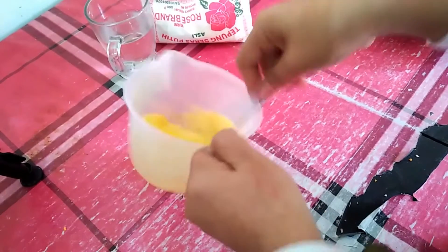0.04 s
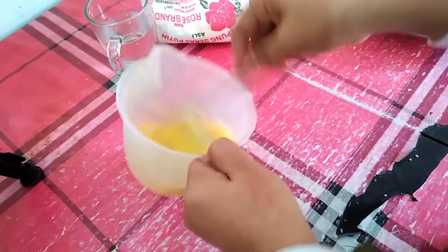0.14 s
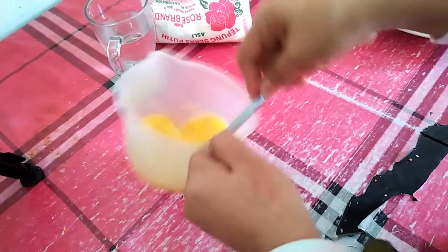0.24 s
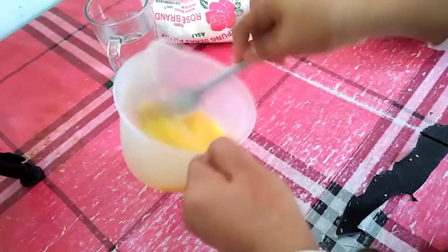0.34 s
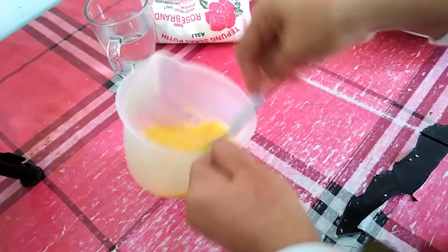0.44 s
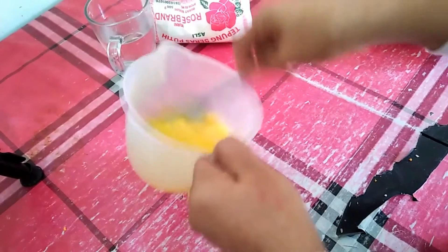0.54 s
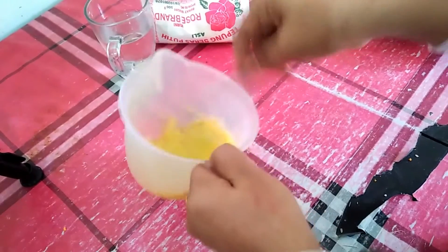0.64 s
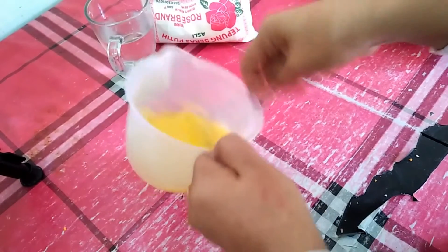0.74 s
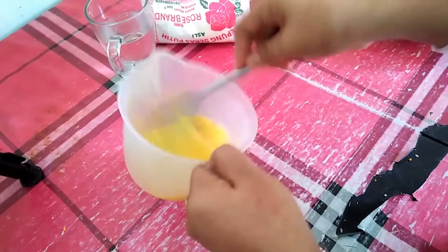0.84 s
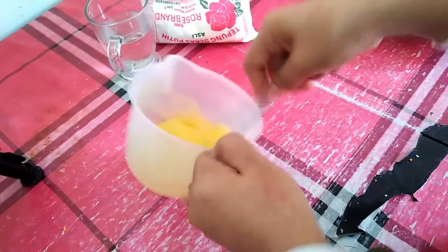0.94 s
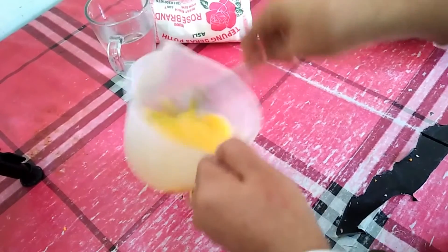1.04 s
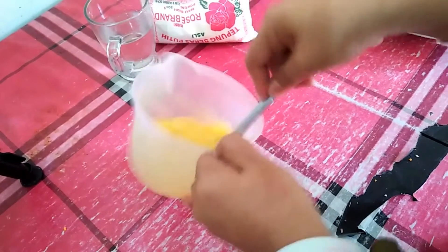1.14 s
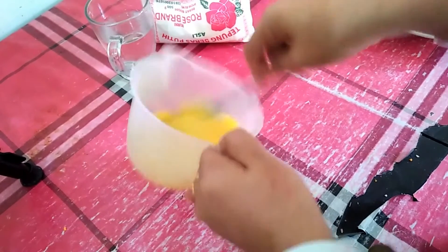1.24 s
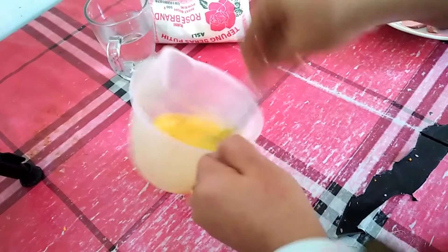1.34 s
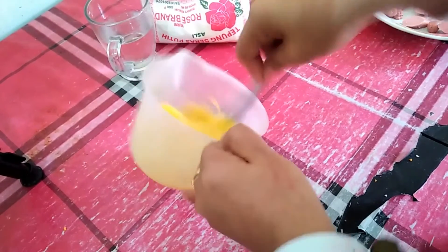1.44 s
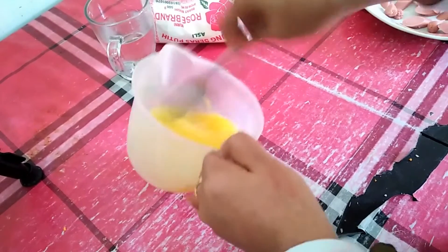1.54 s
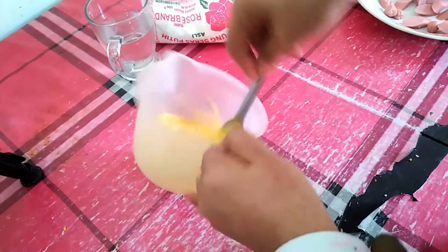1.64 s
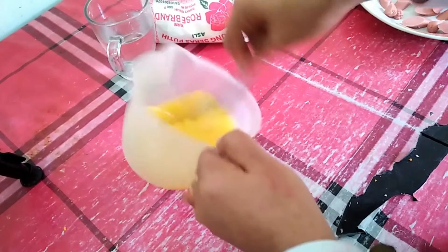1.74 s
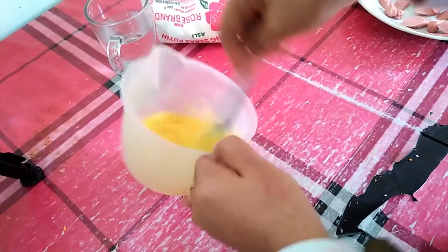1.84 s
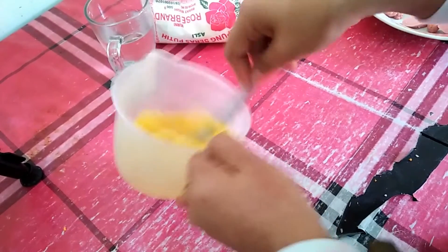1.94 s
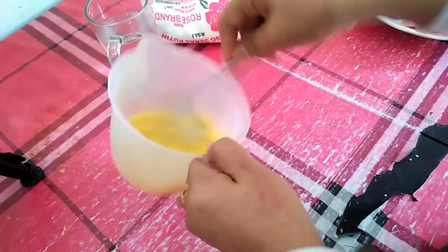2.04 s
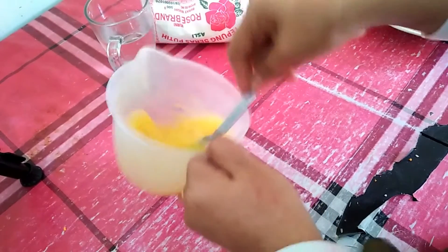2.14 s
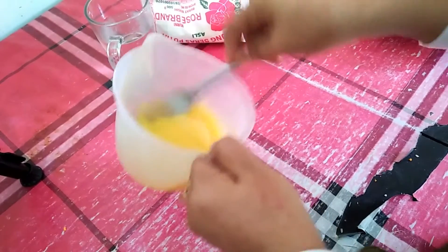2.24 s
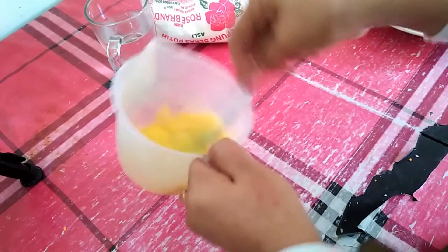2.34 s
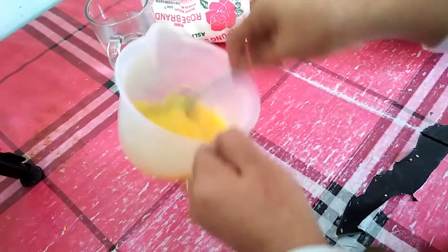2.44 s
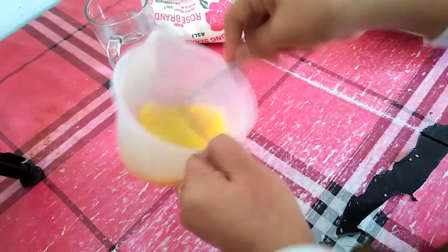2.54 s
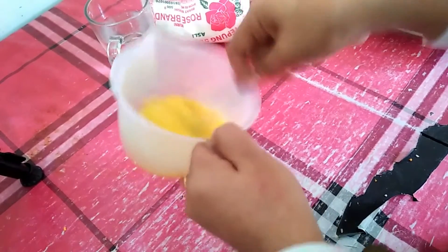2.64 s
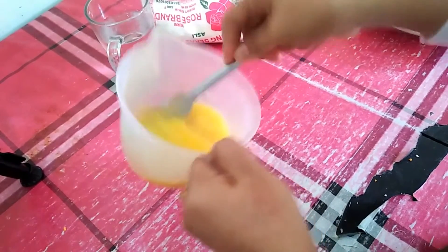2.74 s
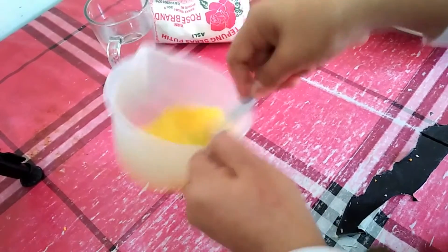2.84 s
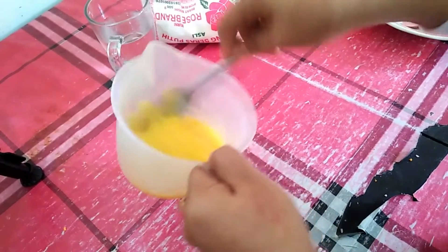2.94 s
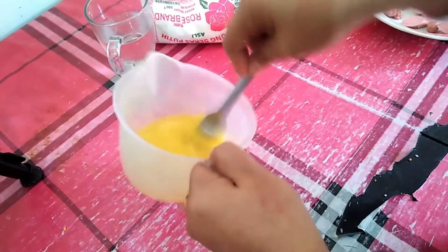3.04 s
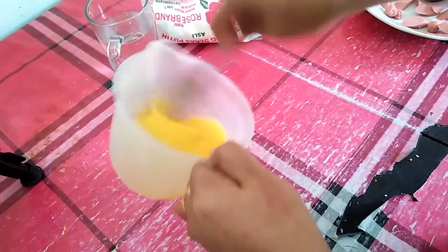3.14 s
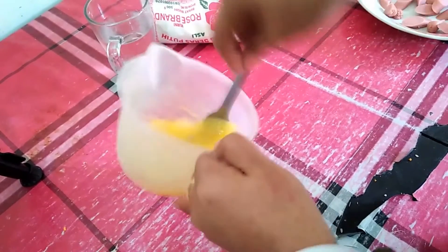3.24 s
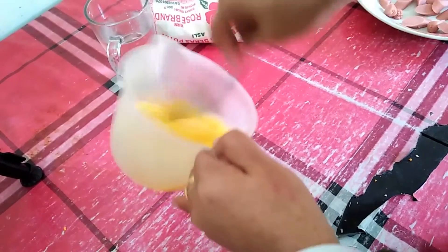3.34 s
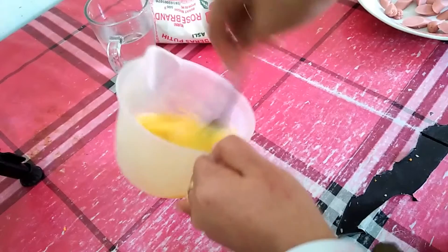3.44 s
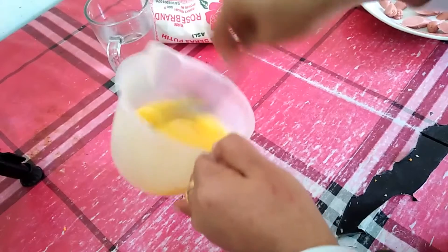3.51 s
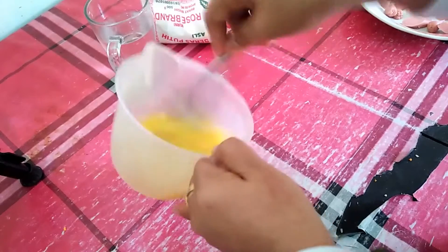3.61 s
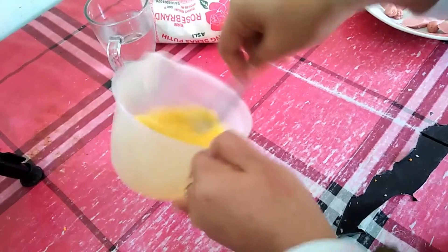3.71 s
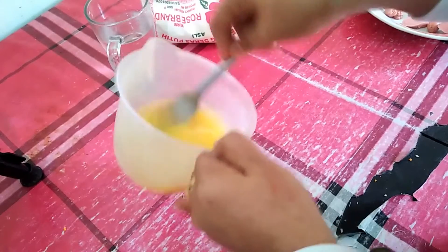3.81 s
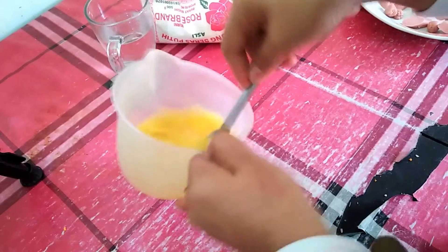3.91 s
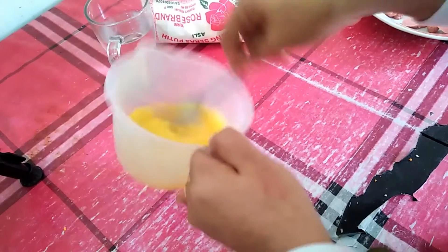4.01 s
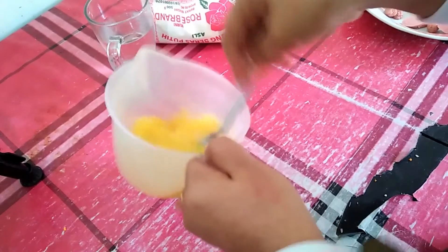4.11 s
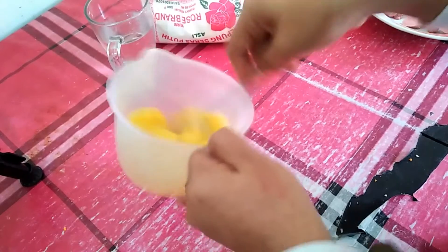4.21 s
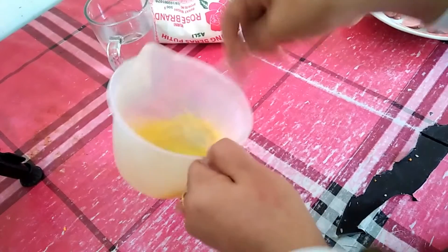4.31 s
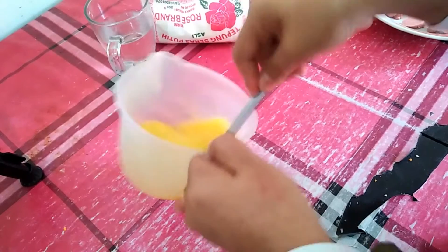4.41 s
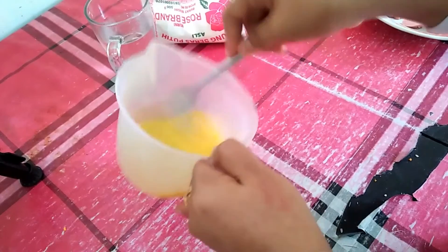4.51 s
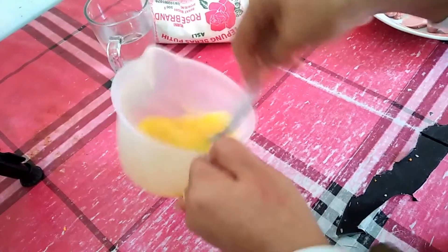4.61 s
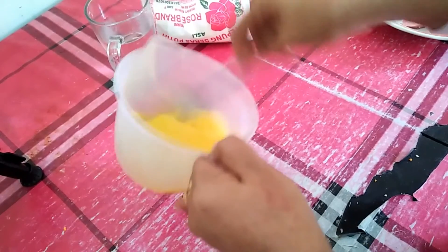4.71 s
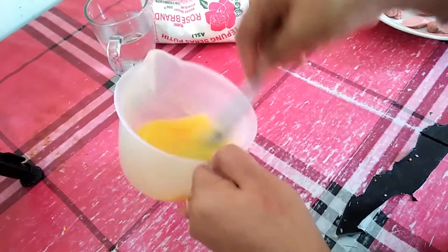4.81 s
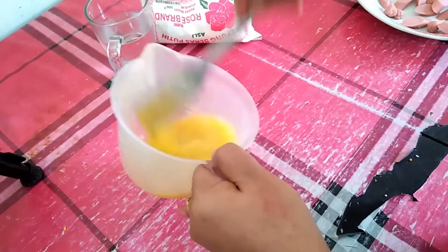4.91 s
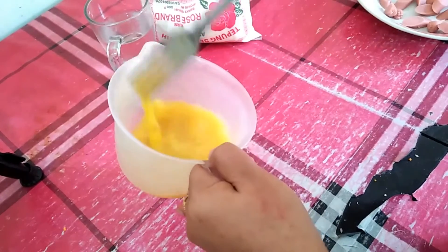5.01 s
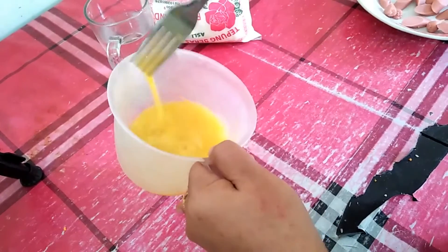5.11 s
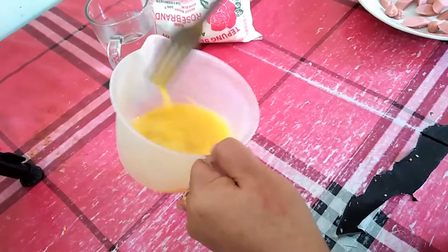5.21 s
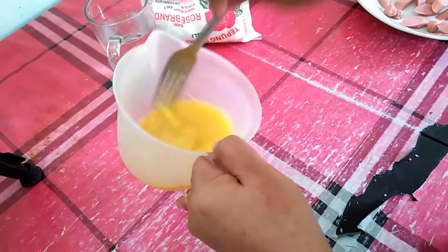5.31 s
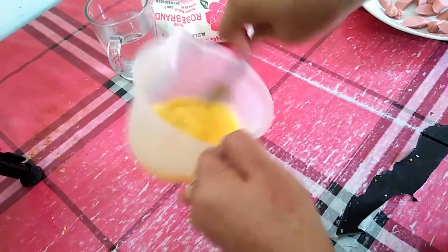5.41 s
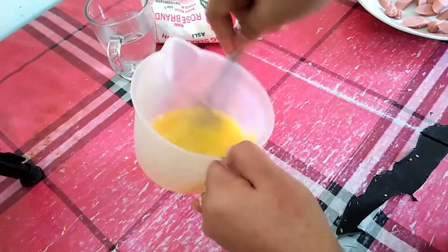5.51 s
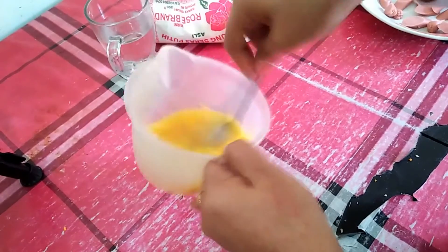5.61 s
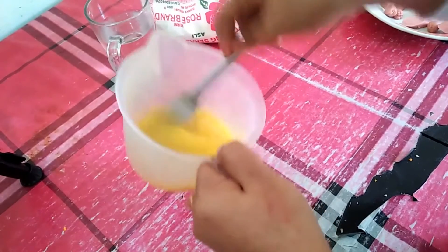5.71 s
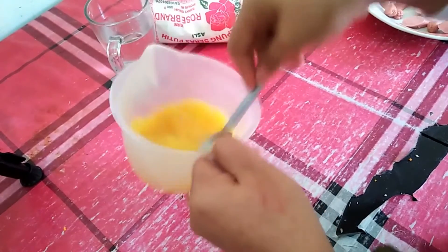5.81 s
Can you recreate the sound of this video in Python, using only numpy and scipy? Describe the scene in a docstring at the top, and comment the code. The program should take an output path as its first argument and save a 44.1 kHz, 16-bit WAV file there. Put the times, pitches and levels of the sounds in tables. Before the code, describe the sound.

Fast, bright fork clicks against a hand-held plastic jug, nearly six strokes a second, with sloppy egg patter in a small hard kitchen.

```python
"""Quick, bright steel clicks come first: a fork beats eggs in a hand-held plastic jug.
It makes nearly six strokes a second, with one short pause. Each touch is a soft thud of noise, damped
jug modes, and noise bursts for the clack of the plastic and the click of the tines.
The egg slops and crackles in patter, bubbles and hiss driven by the strokes, over a faint low swell.
A small hard kitchen answers, and a rough hum wavers faintly in the distance over a low rumble."""
import sys
import numpy as np
from scipy import signal
from scipy.fft import rfft, irfft, next_fast_len
from scipy.io import wavfile
from scipy.ndimage import uniform_filter1d, map_coordinates

SR = 44100
rng = np.random.default_rng(int(sys.argv[2]) if len(sys.argv) > 2 else 0)


def transcribe(signal):
    """Save signal, clipped to [-1, 1], as a 16-bit WAV file at the path in sys.argv[1]."""
    frames = np.atleast_2d(signal).T
    limited = np.clip(frames, -1, 1)
    pcm = np.round(limited * 32767).astype(np.int16)
    wavfile.write(sys.argv[1], SR, pcm)


N = 258425  # length of the scene in samples
BLOW = np.arange(SR // 16) / SR  # time axis of one short event, s


def amp(db):
    """Decibels to gain."""
    return 10 ** (np.asarray(db) / 20)


def unit(x):
    """Scaled to rms 1."""
    return x / np.sqrt(np.mean(x ** 2) + 1e-20)


def along(points, hz):
    """Interpolates (f/Hz, value) points on a log frequency axis."""
    f, v = np.transpose(points)
    return np.interp(np.log(hz + 1), np.log(f + 1), v)


def wobble(rate):
    """A smooth random curve with this many knots a second."""
    knots = rng.standard_normal(int(N * rate / SR) + 4)
    return map_coordinates(knots, [np.arange(N) * rate / SR])


def filtered(x, response):
    """Zero-phase filter: the spectrum of x times a response of frequency."""
    m = next_fast_len(N + SR // 2)
    return irfft(rfft(x, m) * response(np.fft.rfftfreq(m, 1 / SR)), m)[..., :N]


def coloured(x, spectrum, patchy_db=0):
    """Minimum-phase filter with the given spectrum; if patchy, each row gets its own peaks and dips."""
    n = x.shape[-1]
    half = next_fast_len(n)
    db = along(spectrum, np.fft.rfftfreq(2 * half, 1 / SR))
    if patchy_db:
        knots = np.clip(rng.standard_normal((len(x), 36)), -2, 2)
        db = db + patchy_db * signal.resample(knots, half + 1, axis=1)
    # folding the cepstrum onto positive time makes the filter causal
    cepstrum = irfft(np.log(amp(db)))
    cepstrum[..., 1:half] *= 2
    cepstrum[..., half + 1:] = 0
    return irfft(rfft(x, 2 * half) * np.exp(rfft(cepstrum)))[..., :n]


def placed(shapes, s, db):
    """Lays one shape per event at its time; its level is its energy spread over 10 ms."""
    size = np.sqrt(np.sum(shapes ** 2, axis=1) / (SR // 100) + 1e-20)
    levelled = shapes * (amp(db) / size)[:, None]
    where = np.round(np.maximum(s, 0)[:, None] * SR).astype(int) + np.arange(len(BLOW))
    return np.bincount(where.ravel(), levelled.ravel(), N)[:N]


def impulses(s, strength):
    """One single-sample push per event."""
    return np.bincount(np.round(np.abs(s) * SR).astype(int), strength, N)[:N]


# Fader curve of the distant hum, before its trim: [t/s, level/dB]
HUM_LEVEL = [(0, -62), (.9, -81), (1.08, -49), (1.39, -68), (1.58, -45.5), (1.76, -66), (2.3, -70),
             (2.97, -53.5), (3.57, -48.5), (3.9, -66.5), (4.3, -47), (5.0, -76), (5.17, -55), (5.5, -38.5),
             (5.86, -46)]
# Tonal lines of the hum, relative: [f/Hz, level/dB]
HUM_LINES = [(66.2, 9), (100, -10), (151, -10)]
# Colour of the rough noise in the hum, relative: [f/Hz, level/dB per Hz]
HUM_NOISE = [(20, -18), (45, -0.5), (66, 1), (105, 5), (160, -12.5), (260, -9), (600, -52)]
# Colour of the house rumble, relative: [f/Hz, level/dB per Hz]
RUMBLE = [(15, -5), (35, -19), (70, -7), (140, -5), (250, -17.5), (500, -20), (1000, -20.5), (3000, -25),
          (12000, -33.5)]


def background():
    """A distant hum of wavering sines and coloured noise over the low rumble of the house."""
    t = np.arange(N) / SR
    turns = np.cumsum(1 + .03 * wobble(16)) / SR  # all lines drift in pitch together
    lines = unit(sum(amp(db + 1.8 * wobble(10)) * np.sin(2 * np.pi * hz * turns) for hz, db in HUM_LINES))
    hum = lines + amp(-6.0) * unit(coloured(rng.standard_normal(N), HUM_NOISE))
    rumble = unit(coloured(rng.standard_normal(N), RUMBLE))
    trim_db, rumble_db = -6.0, -63
    return amp(np.interp(t, *np.transpose(HUM_LEVEL)) + trim_db) * hum + amp(rumble_db) * rumble


# Decay time of the room: [f/Hz, t60/s]
KITCHEN_DECAY = [(200, 0.17), (320, 0.55), (550, 0.2), (1000, 0.49), (3500, 0.44), (9500, 0.52),
                 (15000, 0.4)]
# Colour of the echo from the walls, relative: [f/Hz, level/dB]
WALL_ECHO = [(150, -17), (270, -8), (322, 2), (375, -14), (450, 1), (600, -1.5), (1000, -9), (2200, -5),
             (5000, -10.5), (9500, -9.5), (14000, -7)]


def kitchen(x, db, build_s):
    """The room's answer: decaying noise tails, redrawn every 1/8 s as the jug and hands move."""
    wet, step = np.zeros(N + SR), SR // 8
    for start in range(0, N, step):
        hz, t, z = signal.stft(rng.standard_normal(SR // 2), SR, nperseg=256)
        decay = amp(-60 * t / along(KITCHEN_DECAY, hz)[:, None])
        tail = signal.istft(z * decay, SR, nperseg=256)[1]
        tail *= 1 - np.exp(-(np.arange(len(tail)) / SR / build_s) ** 2)
        answer = signal.fftconvolve(x[start:start + step], tail / np.linalg.norm(tail))
        wet[start:start + len(answer)] += answer
    return amp(db) * coloured(wet[:N], WALL_ECHO)


# Level of the side signal, treble only, relative: [f/Hz, level/dB]
SIDE_LEVEL = [(3000, -75), (3700, -40), (4400, -12), (6000, -9), (9000, -11), (13000, -9)]


def treble_side(near):
    """A treble-only side signal of decaying noise widens the stereo."""
    return coloured(kitchen(near, db=4, build_s=.003), SIDE_LEVEL)


# Drive of the fork through the egg, in three spells of deep beating: [t/s, thud level/dB]
PLUNGE_DRIVE = [(0, -30.5), (1.15, -36), (1.75, -53), (2.2, -48), (2.36, -31.5), (3.22, -39), (3.44, -54.5),
                (4.3, -38), (4.8, -31.5), (5.86, -59)]


def plunge_db(s):
    """How hard the fork is driven through the egg at these times."""
    return np.interp(s, *np.transpose(PLUNGE_DRIVE))


def low_swell(hz, t60, db):
    """A faint, low damped sine swells with each stroke, stronger when the plunge is stronger."""
    s = np.transpose(STROKES)[0]
    pushes = impulses(s, amp(plunge_db(s)))
    t = np.arange(SR // 4) / SR
    swell = np.sin(2 * np.pi * hz * t) * amp(-60 * t / t60) * (1 - np.exp(-t / .012))
    return amp(db) * signal.fftconvolve(pushes, swell)[:N]


def bubbles(per_s, hz, spread, cycles):
    """Air folded into the egg: tiny sine blips at random times and pitches, damped by the thick liquid."""
    count, t = int(per_s * N / SR), BLOW[:int(SR * cycles / hz)]
    pitch, size = np.clip(rng.standard_normal((count, 2)), -1.6, 1.6).T[:, :, None]
    turns = hz * np.exp(spread * pitch) * t
    fade = amp(8.4 * size - 40 * turns / cycles)  # 40 dB down after this many cycles
    blips = np.sin(2 * np.pi * turns) * fade * (1 - np.exp(-turns))
    where = rng.integers(0, N, (count, 1)) + np.arange(len(t))
    return unit(np.bincount(where.ravel(), blips.ravel(), N)[:N])


def slosh(settle_s, db):
    """Each plunge sets the whole egg swinging, and it gurgles low until it settles."""
    s = np.transpose(STROKES)[0]
    age = np.maximum(np.arange(N) / SR - s[:, None], 0) / settle_s
    swing = amp(plunge_db(s)) @ (age * np.exp(1 - age))
    return amp(db) * swing * bubbles(per_s=340, hz=473, spread=.3, cycles=17)


def mode(hz, t60, rise_s, scatter):
    """A damped sine mode for each event; pitch and decay time vary a little at random."""
    variation = np.array([scatter, .2])[:, None, None]
    tune, life = np.exp(rng.standard_normal((2, len(hz), 1)) * variation)
    swing = np.sin(2 * np.pi * np.reshape(hz, (-1, 1)) * tune * BLOW)
    return swing * amp(-60 * BLOW / (t60 * life)) * (1 - np.exp(-BLOW / rise_s))


# The egg folds over pockets of air; pitch is before scatter: [t/s, f/Hz, level/dB]
GLUGS = [(.757, 620, -31), (.782, 633, -33.5), (.873, 630, -35.5), (1.04, 690, -34), (1.075, 350, -40),
         (1.24, 600, -37.5), (2.734, 330, -36.5), (2.912, 330, -36), (4.023, 500, -29), (4.54, 567, -32),
         (4.712, 480, -41), (4.876, 508, -32.5)]


def glugs():
    """Each pocket of air in the egg sounds a short, low note with a briefer one below it."""
    s, hz, db = np.transpose(GLUGS)
    note = mode(hz, t60=.04, rise_s=0.0036, scatter=0.053)
    note += amp(1.5) * mode(0.47 * hz, t60=0.01, rise_s=.002, scatter=0.11)
    return placed(note, s, db)


# Colour of egg slapped or cut, relative: [f/Hz, level/dB per Hz]
EGG = [(200, -30.5), (330, -30), (600, -12), (950, 28.5), (1400, -5.5), (2400, -6.5), (4000, -1.5),
       (5500, -5.5), (9200, -4), (12000, -24), (15000, -23)]


def egg(touches, settle_s, drops_per_s, spread_db, patter_db, bubble_db):
    """Egg flung by each touch rises and falls back as a patter of tiny noise slaps and bubbles."""
    s, _, _, ring_db, clack_db, _ = touches.T
    pushes = impulses(s, amp(ring_db) + amp(clack_db))
    age = np.arange(SR // 4) / SR / settle_s
    motion = np.abs(signal.fftconvolve(pushes, age * np.exp(1 - age))[:N]) ** 0.98
    drop_sizes = rng.standard_normal(N) * amp(spread_db * rng.standard_normal(N))
    drops = (rng.random(N) < drops_per_s / SR) * drop_sizes
    splat = rng.standard_normal(len(BLOW)) * amp(-60 * BLOW / 0.00064)
    patter = unit(coloured(signal.fftconvolve(drops, splat)[:N], EGG))
    froth = bubbles(per_s=600, hz=1682, spread=0.478, cycles=41)
    return motion * (amp(patter_db) * patter + amp(bubble_db) * froth)


def swish(lead_s, width_s, db):
    """Just before they land, the tines cut through the egg: a short swell of noise."""
    s, _, ring_db, _ = np.transpose(STROKES)
    cut = rng.standard_normal((len(s), len(BLOW))) * np.exp(-(BLOW / width_s - 2) ** 2)
    return placed(coloured(cut, EGG), s - lead_s - 2 * width_s, db + .5 * (ring_db - ring_db.mean()))


# Colour of foam torn by the tines, relative: [f/Hz, level/dB per Hz]
FROTH = [(900, -13), (1500, -1.5), (2200, -1.5), (4000, -5), (6000, -4), (9000, -2.5), (14000, -13)]


def sweep(peak_s, width_s, grain_db, follows, db):
    """After landing, the tines drag through the foam with a grainy hiss that swells and fades."""
    s, _, ring_db, tine_db = np.transpose(STROKES)
    force_db = .5 * (ring_db + tine_db)
    age = np.arange(N) / SR - s[:, None]
    swell = (age > 0) * np.exp(-((age - peak_s) / width_s) ** 2)
    drag = amp(follows * (force_db - force_db.mean())) @ swell
    hiss = coloured(rng.standard_normal(N) * amp(grain_db * wobble(450)), FROTH)
    return amp(db) * drag * unit(hiss)


JUG_HZ = 1030  # pitch of the jug where it is usually struck
RIM_DB_PER_OCTAVE = 14  # spots near the rim sound higher and clack more
# clack of a full-scale blow; dB of clack per dB of the blow
STROKE_CLACK_DB, KNOCK_CLACK_DB, CLACK_GROWS = -18, -11, 0.64
# a knock on the wall moves less egg than the plunge; dB of thud per dB of the knock
WALL_THUD_DB, WALL_THUD_GROWS = -13.5, .25


def clack_growth_db(hz, blow_db):
    """Harder blows and spots nearer the rim clack louder."""
    return CLACK_GROWS * blow_db + RIM_DB_PER_OCTAVE * np.log2(hz / JUG_HZ)


# The fork comes down on the floor of the jug; pitch is before scatter:
# [t/s, jug f/Hz, ring level/dB, tine click level/dB]
STROKES = [(0.1255, 987, -13.5, -16.5), (.304, 970, -19, -21), (0.4675, 967, -13, -16),
           (0.6453, 990, -13.5, -17.5), (0.8164, 870, -17, -16), (.9943, 960, -20, -20),
           (1.1678, 966, -14.5, -15.5), (1.357, 940, -19.5, -28.5), (1.5153, 967, -14.5, -17.5),
           (1.7227, 924, -22.5, -20.5), (1.8881, 982, -21.5, -31), (2.044, 1314, -24, -27.5),
           (2.204, 1070, -21, -24), (2.3613, 940, -19.5, -16), (2.5332, 857, -16.5, -15),
           (2.7033, 980, -24.5, -17.5), (2.8803, 1085, -26.5, -16.5), (3.0715, 870, -21, -17),
           (3.238, 974, -11.5, -16.5), (3.438, 1096, -25, -23.5), (3.6238, 982, -27.5, -25.5),
           (3.7977, 1135, -21.5, -29.5), (3.9626, 1060, -23.5, -32.5), (4.1224, 1103, -22, -22),
           (4.29, 946, -15, -14.5), (4.461, 947, -13, -16), (4.6396, 963, -15.5, -16),
           (4.8037, 968, -13, -13), (5.4844, 978, -17, -31), (5.7061, 1210, -23.5, -23)]


def floor_strokes():
    """Each stroke plunges through the egg and lands on the floor of the jug."""
    s, hz, ring_db, tine_db = np.transpose(STROKES)
    return [s, hz, plunge_db(s), ring_db, STROKE_CLACK_DB + clack_growth_db(hz, ring_db), tine_db]


RATTLE_FROM_S, RATTLE_TO_S = 0.0087, .07  # window for taps after the fork has come down
RATTLE_RING_DB, RATTLE_CLICK_DB, RATTLE_SCATTER_DB = -12, -19, 2.5  # against the stroke
RATTLE_FOLLOWS = 0.71  # dB of rattle per dB of the stroke


def rattles(count):
    """Light chance taps on the wall, spread over the sweep that follows each stroke."""
    s, _, ring_db, tine_db = np.repeat(STROKES, count, axis=0).T
    phase = rng.random(len(s))
    pitch, size, edge = rng.standard_normal((len(s), 3)).T
    stroke_db = .5 * (ring_db + tine_db)
    followed_db = stroke_db.mean() + RATTLE_FOLLOWS * (stroke_db - stroke_db.mean())
    force_db = followed_db + RATTLE_SCATTER_DB * size
    when = s + RATTLE_FROM_S + (RATTLE_TO_S - RATTLE_FROM_S) * phase
    click_db = force_db + RATTLE_CLICK_DB + RATTLE_SCATTER_DB * edge
    return [when, JUG_HZ * np.exp(.09 * pitch), force_db + RATTLE_RING_DB, click_db]


# Sweeping on, the fork knocks against the wall; pitch is before scatter:
# [t/s, jug f/Hz, ring level/dB, tine click level/dB]
KNOCKS = [(.001, 1034, -22.5, -28), (0.016, 1240, -23, -29), (.027, 1406, -19.5, -30.5),
          (.147, 1100, -14.5, -15), (0.1606, 908, -11, -32), (0.3212, 1263, -14, -21),
          (0.489, 970, -20, -31), (0.5002, 1110, -11, -25), (.67, 1044, -12.5, -21),
          (.709, 1040, -27, -37.5), (0.7577, 943, -20.5, -46), (.845, 1010, -22, -19.5),
          (1.0177, 1110, -14, -27.5), (1.0293, 1010, -11, -18), (1.059, 1070, -22, -31.5),
          (1.1975, 997, -16, -22.5), (1.2477, 958, -23.5, -29.5), (1.367, 917, -23, -26.5),
          (1.4012, 925, -25.5, -35), (1.546, 980, -26, -35), (1.733, 990, -37, -31),
          (1.899, 930, -27, -32.5), (2.0905, 1040, -15, -29.5), (2.2097, 1035, -23.5, -27),
          (2.2905, 1070, -28, -59), (2.3863, 1028, -14, -21.5), (2.4284, 980, -24, -39),
          (2.5609, 976, -22, -32), (2.735, 1180, -29, -23.5), (2.9129, 1075, -21.5, -29),
          (3.1074, 1090, -24, -29.5), (3.1373, 996, -22, -63), (3.155, 940, -23.5, -31.5),
          (3.272, 980, -20.5, -41), (3.2932, 973, -21.5, -22), (3.318, 1130, -32, -34.5),
          (3.45, 940, -23.5, -32), (3.476, 978, -19.5, -24), (3.6424, 1000, -20.5, -30.5),
          (3.843, 980, -14, -27.5), (4.0004, 1140, -19.5, -36.5), (4.0254, 1064, -14.5, -22),
          (4.1374, 957, -16.5, -22), (4.169, 1063, -21.5, -29.5), (4.1853, 1070, -21.5, -29.5),
          (4.3131, 996, -10, -20), (4.3421, 1003, -17, -29.5), (4.3684, 1046, -21.5, -34.5),
          (4.4887, 1094, -12, -18), (4.509, 1010, -9.5, -29), (4.527, 1070, -29, -27),
          (4.5422, 1040, -14.5, -29), (4.6658, 1030, -13.5, -23), (4.697, 1130, -29, -27),
          (4.7137, 1140, -20.5, -30), (4.8325, 1047, -10.5, -20.5), (4.88, 997, -16, -26),
          (5.533, 1023, -20, -30.5), (5.7255, 1104, -29.5, -38), (5.7468, 1027, -24.5, -38)]


def wall_knocks():
    """Knocks and chance rattles on the wall, with less thud than the plunge."""
    s, hz, ring_db, tine_db = np.hstack([np.transpose(KNOCKS), rattles(count=1)])
    thud_db = plunge_db(s) + WALL_THUD_DB + WALL_THUD_GROWS * (ring_db - ring_db.mean())
    return [s, hz, thud_db, ring_db, KNOCK_CLACK_DB + clack_growth_db(hz, tine_db), tine_db]


GRAZE_RING_DB, GRAZE_CLACK_DB = -7, -21  # against the tine click
# On the way up the tips of the tines graze the wall: [t/s, tine click level/dB]
GRAZES = [(.235, -22), (1.6, -32), (2.4539, -29), (2.4688, -23.5), (2.651, -26), (3.001, -23), (3.695, -32),
          (5.557, -26)]


def tip_grazes():
    """Grazing tips mostly click, with only a little ring and clack."""
    s, tine_db = np.transpose(GRAZES)
    thud_db = plunge_db(s) + WALL_THUD_DB
    return [s, np.full(len(s), JUG_HZ), thud_db, tine_db + GRAZE_RING_DB, tine_db + GRAZE_CLACK_DB, tine_db]


def contacts():
    """Every touch of fork on jug, as rows [t/s, jug f/Hz, thud/dB, ring/dB, clack/dB, tine click/dB]."""
    return np.hstack([floor_strokes(), wall_knocks(), tip_grazes()]).T


def chatter(count, t60, again_s, again_db, skid_db, skid_t60):
    """Noise bursts: one tine lands, the next a moment later, then they skid on in tiny slips."""
    size = (count, len(BLOW))
    late = BLOW - again_s * rng.uniform(0.82, 2.4, (count, 1))
    again_level_db = again_db + 1.7 * rng.standard_normal((count, 1))
    second = (late > 0) * amp(again_level_db - 60 * abs(late) / t60)
    slips = (rng.random(size) < 160 / SR) * rng.exponential(1, size)  # about 160 a second
    skid = signal.lfilter([1], [1, -np.exp(-1 / (0.0054 * SR))], slips)
    skid = skid * amp(skid_db - 60 * BLOW / skid_t60)
    return (amp(-60 * BLOW / t60) + second + skid) * rng.standard_normal(size)


# Colours of a contact, relative: [f/Hz, level/dB per Hz]
THUD = [(120, -58.5), (220, -18.5), (320, 5.5), (375, -6), (450, 3.5), (600, -4), (800, -7.5), (1500, -25)]
CLACK = [(700, -29.5), (1300, 6.5), (1700, -1), (2200, -0.5), (2700, -2), (3700, -2.5), (4600, -4),
         (5800, -25), (8000, -36)]
TINES = [(3000, -20.5), (5800, -10.5), (7000, -7), (8400, 0), (9400, 1.5), (10500, -6), (12000, -13),
         (14300, -15), (16000, -51)]
# Lasting modes of the jug, before scatter, level within the ring: [f/Hz, level/dB, t60/s]
JUG_MODES = [(898.8, -19, 0.083), (1015.7, -26.5, 0.09)]


def fork(touches):
    """The fork plunges through the egg with a soft thud, then clicks on the plastic, which clacks and rings."""
    s, hz, thud_db, ring_db, clack_db, tine_db = touches.T
    count = len(s)
    # a square blow is all tine click; a glancing one clacks and scrapes on along the wall
    glance_db = .5 * np.clip(clack_db - tine_db, -12, 8)[:, None]
    ring = mode(hz, t60=.017, rise_s=.004, scatter=.02)
    ring += amp(-15.5) * mode(1.4 * hz, t60=0.021, rise_s=0.0027, scatter=.1)
    for lasting_hz, db, t60 in JUG_MODES:
        ring += amp(db) * mode(np.full(count, lasting_hz), t60, rise_s=0.0095, scatter=.012)
    plunge = chatter(count, t60=0.016, again_s=0.0024, again_db=0.5, skid_db=-11.5, skid_t60=0.043)
    nudge = mode(np.full(count, 900), t60=.014, rise_s=.001, scatter=.1)
    clack = chatter(count, t60=0.02, again_s=0.0014, again_db=9.0, skid_db=glance_db - 10.0, skid_t60=0.18)
    tines = chatter(count, t60=.0075, again_s=.0012, again_db=-4, skid_db=glance_db - 12, skid_t60=.15)
    # every spot on the wall and every angle of the fork favours other resonances
    clack = coloured(clack, CLACK, patchy_db=2.6)
    tines = coloured(tines, TINES, patchy_db=1.5)
    # the soft part starts about 6 ms before the click
    soft = placed(coloured(plunge, THUD), s - .0056, thud_db + 0.5) + placed(nudge, s - .006, thud_db - 8.5)
    return soft + placed(ring, s, ring_db) + placed(clack, s, clack_db) + placed(tines, s, tine_db)


# The small jug gives off little bass: [f/Hz, level/dB]
RADIATION = [(60, -3), (150, -6), (280, -3.5), (600, 0)]


def scene():
    """Fork and egg with the kitchen's answer in the middle, a treble-only side, and the background."""
    touches = contacts()
    splash = egg(touches, settle_s=0.021, drops_per_s=900, spread_db=1.0, patter_db=-25.5, bubble_db=-30.0)
    foam = sweep(peak_s=0.061, width_s=0.04, grain_db=2.5, follows=0.92, db=-42)
    cuts = swish(lead_s=.004, width_s=.005, db=-41.5)
    liquid = splash + foam + cuts + slosh(settle_s=.04, db=-16.5) + glugs()
    near = coloured(fork(touches) + liquid, RADIATION)
    mid = near + kitchen(near, db=-3.5, build_s=0.004) + low_swell(hz=66, t60=.2, db=-15)
    side = treble_side(near)
    return np.array([mid + side, mid - side]) + background()


def suppressed(x, threshold_db, depth_db, hold_s):
    """Noise suppressor: treble is turned down in both channels while it stays faint in the first."""
    upper = filtered(x, lambda hz: hz ** 4 / (hz ** 4 + 1500 ** 4))
    power = np.abs(uniform_filter1d(upper[0] ** 2, int(hold_s * SR)))
    level_db = 10 * np.log10(power + 1e-12)
    gain_db = np.clip(2 * (level_db - threshold_db), -depth_db, 0)
    return x + upper * (amp(gain_db) - 1)


TOP_HZ = 14650  # steep upper edge of the band


def record(dry):
    """Faint treble is suppressed, the loudest clicks are rounded off near full scale, the top is cut."""
    x = suppressed(dry, threshold_db=-53, depth_db=12, hold_s=.08)
    rounded = x / (1 + np.abs(x / 1.05) ** 6) ** (1 / 6)
    return filtered(rounded, lambda hz: 1 / np.sqrt(1 + (hz / TOP_HZ) ** 120))


dry = scene()
out = record(dry)
transcribe(out)
```